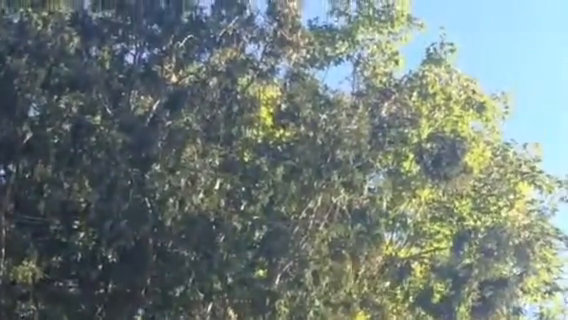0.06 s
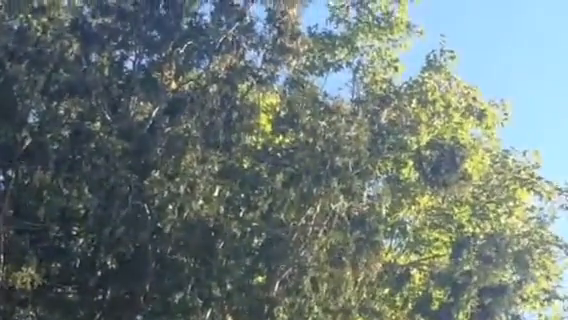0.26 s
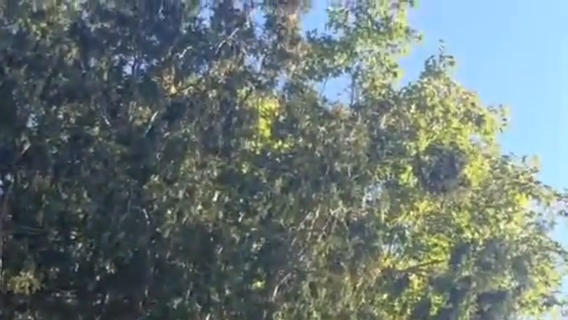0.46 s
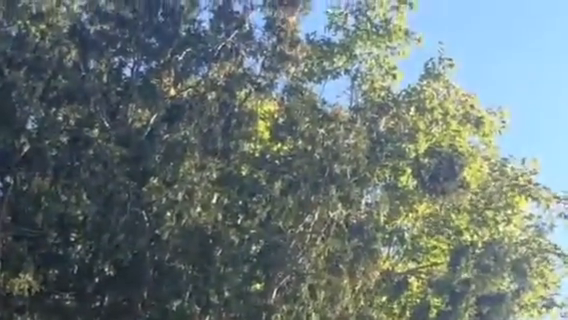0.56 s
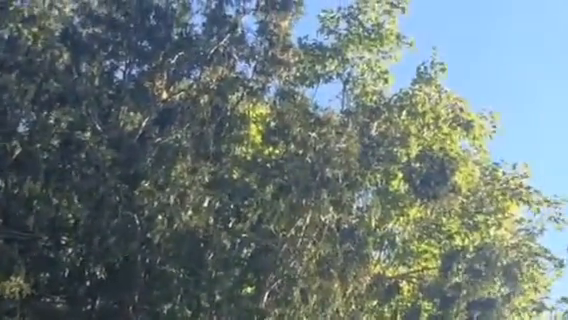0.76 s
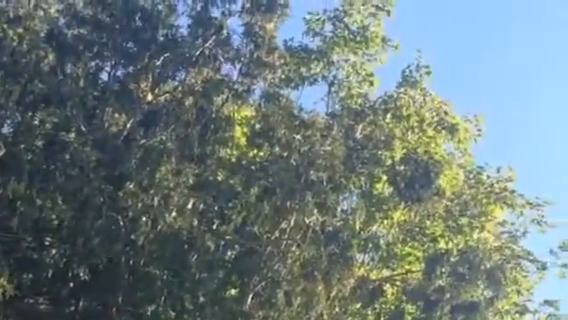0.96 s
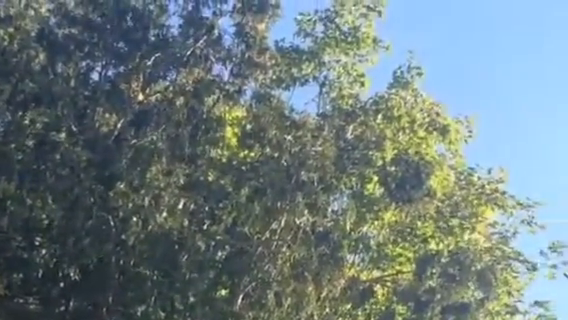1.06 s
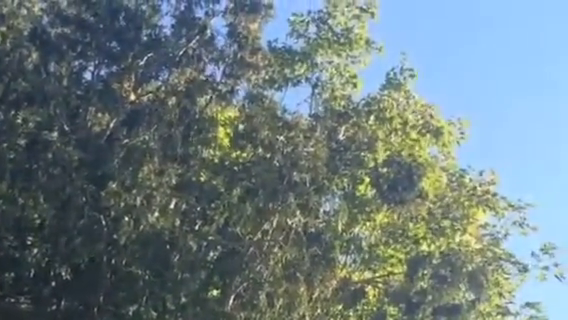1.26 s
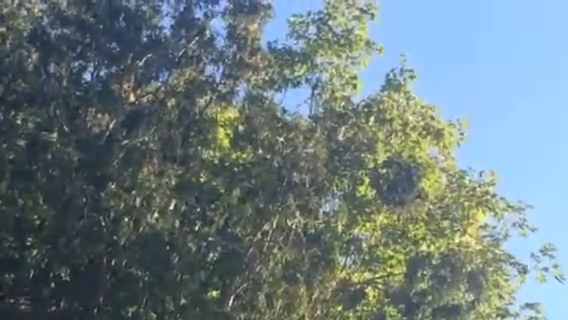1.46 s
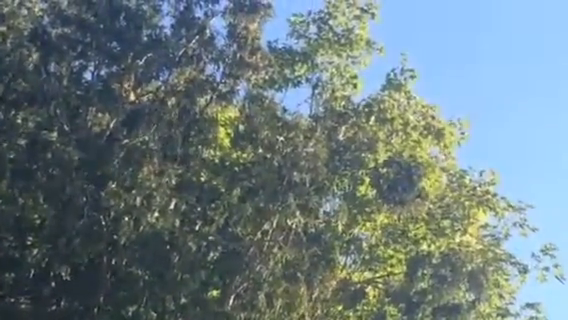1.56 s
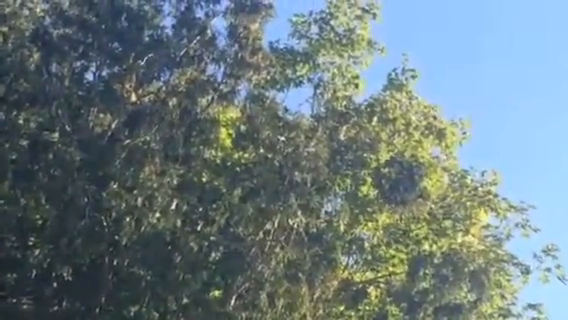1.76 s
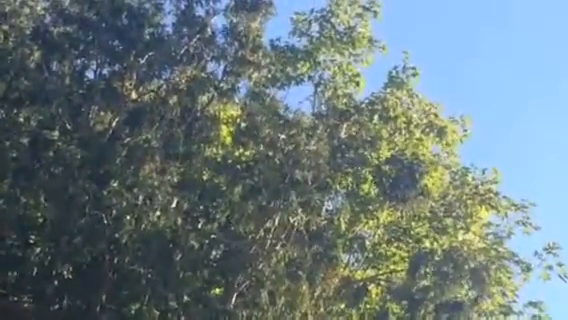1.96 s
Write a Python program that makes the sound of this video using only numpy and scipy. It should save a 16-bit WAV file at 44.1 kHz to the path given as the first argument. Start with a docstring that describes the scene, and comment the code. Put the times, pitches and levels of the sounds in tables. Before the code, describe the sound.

One sharp snap among trees, over a low outdoor rumble and faint insect chirps.

```python
"""A low outdoor rumble and hush, with insects chirping far off, heard from one microphone among trees.
At 0.22 s comes one sharp snap: a few milliseconds of bright ring and crack that jolt a low knock out of
a resonant body. The foliage scatters it back, near surfaces first and the far wood last.
Later come two faint ticks and, between them, a short soft scrape."""
import sys
import numpy as np
from scipy import signal
from scipy.fft import rfft, irfft, next_fast_len
from scipy.io import wavfile
from scipy.ndimage import map_coordinates

SR = 44100
rng = np.random.default_rng(int(sys.argv[2]) if len(sys.argv) > 2 else 0)


def bounce(signal):
    """Save signal as a 16-bit WAV file at the path given by the first command-line argument."""
    frames = np.transpose(np.atleast_2d(signal))
    limited = np.clip(frames, -1, 1)
    pcm = np.round(limited * 32767).astype(np.int16)
    wavfile.write(sys.argv[1], SR, pcm)


N = 88200

SNAP_S, ATTACK_S, HOLD_S, RELEASE_S = 0.2208, 0.00064, 0.0028, 0.0014  # the snap's onset and envelope


def amp(db):
    """Decibels to gain."""
    return 10 ** (np.asarray(db) / 20)


def unit(x):
    """x scaled to rms 1."""
    return x / np.sqrt(np.mean(x ** 2) + 1e-20)


def since(s):
    """Seconds since time s, per sample."""
    return np.arange(N) / SR - s


def curve(rows):
    """(t/s, value) rows joined by straight lines."""
    return np.interp(since(0), *np.transpose(rows))


def wobble(rate):
    """A smooth random curve with rate knots a second."""
    return map_coordinates(rng.standard_normal(4096), [np.arange(N) * rate / SR], mode="wrap")


def filtered(x, response):
    """x through a filter whose gain is response(hz)."""
    size = next_fast_len(N + SR // 2)
    return irfft(rfft(x, size) * response(np.fft.rfftfreq(size, 1 / SR)), size)[:N]


def noise(colour):
    """Noise of rms 1 with a (f/Hz, level/dB) spectrum that falls away beyond its ends."""
    f, db = np.transpose(colour)
    log_f = np.log(np.r_[f[0] / 2, f, f[-1] * 2] + 1)
    db = np.r_[db[0] - 20, db, db[-1] - 20]
    gain = lambda hz: amp(np.interp(np.log(hz + 1), log_f, db, left=-np.inf, right=-np.inf))
    return unit(filtered(rng.standard_normal(N), gain))


def resonant_noise(peaks):
    """Noise of rms 1 in steep resonances (f/Hz, half-width/Hz, level/dB)."""
    gain = lambda f: sum(amp(db) / (1 + ((f - hz) / width) ** 2) for hz, width, db in peaks)
    return unit(filtered(rng.standard_normal(N), gain))


def decay(s, t60, attack=0.0014):
    """An envelope that rises at time s and loses 60 dB every t60 seconds."""
    t = np.maximum(since(s), 0)
    return (1 - np.exp(-t / attack)) * amp(-60 * t / t60)


def echo(x, t60, attack):
    """Diffuse reflections of x off the trees: a dying noise tail of unit energy."""
    tail = rng.standard_normal(N) * decay(0, t60, attack)
    return signal.fftconvolve(x, tail / np.linalg.norm(tail))[:N]


def distant_rumble():
    """Low noise and a wavering drone swell and ebb together in the distance."""
    # lines of the drone, and spectrum of the rumble (f/Hz, level/dB)
    drone_lines = [(73, -5.5), (115.5, -3.5), (188, -6.5)]
    colour = [(22, -29), (40, -11.5), (60, -3.5), (90, -4.5), (145, -3.5), (210, -9), (260, -13),
              (340, -22), (500, -25), (650, -49)]
    # their common swell (t/s, level/dB)
    swell = [(0, -63.5), (.3, -60), (.45, -54.5), (.57, -57.5), (.68, -53.5), (.86, -52), (.93, -54.5),
             (1.07, -56), (1.15, -55), (1.32, -56.5), (1.4, -60.5), (1.58, -59), (1.68, -64.5), (2, -63.5)]
    drone, drift_rad = np.zeros(N), 0.93
    for hz, db in drone_lines:
        level = amp(db + 2.0 * wobble(7.96))
        drone += level * np.sin(2 * np.pi * hz * since(0) + drift_rad * wobble(6.96))
    return amp(curve(swell) + 1.16 * wobble(13.94)) * (amp(-2.5) * noise(colour) + amp(-2) * drone)


def woodland_air():
    """The bed of the place: a low-mid wash, a mid hush and stirring leaves."""
    # spectrum of each layer (f/Hz, level/dB)
    wash_colour = [(170, -9), (250, -1.5), (350, -2), (500, -3), (700, -15)]
    hush_colour = [(400, -29), (510, -18.5), (620, -1.5), (730, 1), (900, -5.5), (1150, -10.5), (1500, -13),
                   (2200, -25.5), (3500, -31.5), (6000, -66)]
    leaf_colour = [(600, -25), (1300, 2.5), (2300, 5.5), (3300, -10), (5000, -14.5), (9000, -42),
                   (15000, -39)]
    # slow rise and fall of each layer (t/s, level/dB)
    wash_swell = [(0, -69), (.5, -64.5), (.85, -67.5), (1.2, -74), (1.6, -71), (2, -68.5)]
    hush_swell = [(0, -57.5), (.7, -56), (1.35, -57.5), (1.55, -56.5), (1.8, -59), (2, -60.5)]
    leaf_swell = [(0, -71.5), (.45, -66.5), (.9, -64), (1.3, -71), (1.6, -72.5), (2, -74)]
    wash = amp(curve(wash_swell)) * noise(wash_colour)
    hush = amp(curve(hush_swell) + 0.45 * wobble(29.7)) * noise(hush_colour)
    leaves = amp(curve(leaf_swell) + 0.37 * wobble(8.7)) * noise(leaf_colour)
    return wash + hush + leaves


def insect_chorus():
    """Far insects merge into a faint, high hiss."""
    # spectrum of the chorus (f/Hz, level/dB)
    colour = [(2000, -9), (4000, -10), (5000, -1.5), (5700, -7), (6700, -1.5), (7900, 1), (9100, -9),
              (11000, -12), (15000, -14.5)]
    return amp(-74 + 0.4 * wobble(25.05)) * noise(colour)


def insect_chirps():
    """Each far chirp is an arch of falling pips, part tone and part lower rasp, echoing in the trees."""
    # chirps (t/s, f/Hz, level/dB, number of pips)
    chirps = [(.005, 4700, -67, 2), (.095, 5020, -77, 3), (.315, 5170, -67.5, 3), (.452, 4690, -69, 3),
              (.645, 5270, -75.5, 3), (.66, 4800, -80, 5), (.775, 5010, -80, 3), (.903, 4700, -68.5, 3),
              (1.035, 5220, -77, 5), (1.07, 4790, -78.5, 4), (1.357, 4705, -67.5, 3), (1.387, 5140, -71, 5),
              (1.847, 5300, -73, 2), (1.86, 4700, -70, 4)]
    spacing_s, width_s, spread_hz, sag_hz_per_s = 0.043, 0.009, 18, 8000
    pips = np.zeros(N)
    for s, hz, db, count in chirps:
        rasp = amp(-5) * resonant_noise([(hz - 90, 305, 0)])
        for k in range(count):
            t = since(s + k * spacing_s)
            pitch = hz + spread_hz * rng.standard_normal()
            tone = amp(-1) * np.sin(2 * np.pi * (pitch * t - sag_hz_per_s * t ** 2 / 2))
            arch_db = 2 * (2 * k / max(count - 1, 1) - 1) ** 2  # the end pips are 2 dB down
            pips += amp(db - arch_db) * np.exp(-(t / width_s) ** 2 / 2) * (tone + rasp)
    return pips + amp(-2.5) * echo(pips, t60=0.42, attack=0.013)


def snap():
    """The direct sound: a sagging ring and a crack of noise share one attack, hold and release."""
    # spectrum of the crack (f/Hz, level/dB)
    crack_colour = [(900, -10), (1750, -13), (2200, 0.5), (3200, 0), (4600, -1), (5200, -7), (5700, -5.5),
                    (7400, -7), (9500, -17), (10300, -27), (15000, -28)]
    ring_hz, sag_hz_per_s = 3959, 105000
    t = since(SNAP_S)
    envelope = np.interp(t, np.cumsum([0, ATTACK_S, HOLD_S, RELEASE_S]), [0, 1, 1, 0])
    phase = 2 * np.pi * (ring_hz * t - sag_hz_per_s * t ** 2 / 2)
    ring = np.sin(phase) + amp(-31) * np.sin(2 * phase)
    return envelope * (amp(-23) * ring + amp(-34.5) * noise(crack_colour))


def knock():
    """The snap jolts a low body: damped modes, a push and its rebound, a rough thud, a short rumble."""
    # modes of the body (f/Hz, level/dB, t60/s)
    modes = [(69.5, -52, .3), (121, -48, 0.17), (178.3, -46, 0.16), (288.7, -41.5, 0.15),
             (425, -45.5, 0.13)]
    # the push and its rebound (t/s, width/s, level/dB)
    pushes = [(.2238, 0.00093, -39.5), (.2283, 0.0013, -36.5)]
    # spectra of the thud and of the rumble after it (f/Hz, level/dB)
    thud_colour = [(45, -12), (70, -7), (180, -2), (260, 0), (400, -3.5), (520, -19)]
    rumble_colour = [(35, -9), (75, 3), (140, 2), (240, -11), (400, -30)]
    s = SNAP_S + 0.0012
    body = sum(amp(db) * decay(s, t60) * np.sin(2 * np.pi * hz * since(s)) for hz, db, t60 in modes)
    for k, (at, width, db) in enumerate(pushes):
        u = since(at) / width
        body += (-1) ** k * amp(db) * (1 - u ** 2 / 2) * np.exp(-u ** 2 / 2)
    rumble = amp(-51.5) * decay(0.275, t60=0.19, attack=0.006) * noise(rumble_colour)
    thud = amp(-46.5) * decay(s, t60=0.29) * noise(thud_colour)
    return body + thud + rumble


def foliage_scatter():
    """Surfaces near the microphone return the snap at once, the trees later, the far wood last."""
    # spectra of the near and the farther returns (f/Hz, level/dB)
    near_colour = [(900, -9.5), (2300, 1), (3700, -0.5), (4600, -5), (5500, -13.5), (7500, -12),
                   (9500, -21), (15000, -36)]
    far_colour = [(900, -4), (2300, -10.5), (3700, -5.5), (4400, -2), (5500, -10.5), (6900, -7),
                  (9500, -23), (11000, -26), (15000, -40)]
    near = amp(-42) * decay(SNAP_S + ATTACK_S + HOLD_S, t60=0.053)
    trees = amp(-53 + 2.3 * wobble(256.5)) * decay(SNAP_S + 0.0154, t60=0.22, attack=0.0019)
    far_wood = amp(-66 + 2.1 * wobble(182)) * decay(SNAP_S + 0.057, t60=0.7, attack=0.02)
    return near * noise(near_colour) + trees * noise(far_colour) + far_wood * noise(far_colour)


def ticks():
    """Two faint bursts of noise die quickly, the second shorter and brighter."""
    # ticks (t/s, level/dB, t60/s, tilt/dB per octave)
    bursts = [(0.463, -58.5, 0.14, -1), (1.739, -72, .04, 9)]
    # their spectrum before the tilt (f/Hz, level/dB)
    colour = [(800, -15), (2000, 5), (3000, 0), (5000, -10), (9000, -20), (15000, -21)]
    sound = np.zeros(N)
    for s, db, t60, tilt in bursts:
        tilted = [(hz, level + tilt * np.log2(hz)) for hz, level in colour]
        sound += amp(db) * decay(s, t60) * noise(tilted)
    return sound


def scrape():
    """One soft stroke swells and fades: a thin squeak amid narrow resonances and hiss."""
    # resonances of the scrape (f/Hz, half-width/Hz, level/dB)
    resonances = [(1980, 99, -6.5), (2270, 100, 0), (2620, 110, -12), (2970, 130, -9), (3400, 100, -19)]
    # spectrum of its hiss (f/Hz, level/dB)
    hiss_colour = [(3000, -14), (6000, -6), (7800, -1), (10000, -10), (15000, -19)]
    peak_s, width_s, squeak_hz = 1.4212, 0.0052, 2803
    t = since(peak_s)
    u = t / width_s
    stroke = np.exp(-u ** 2 / 2) + amp(-13) * np.exp(-(u / 2.6) ** 2 / 2)  # a peak on a wider skirt
    squeak = amp(-52) * np.sin(2 * np.pi * squeak_hz * t)
    return stroke * (squeak + amp(-52.5) * resonant_noise(resonances) + amp(-69) * noise(hiss_colour))


def scene():
    """Everything meets at one microphone; the ring of the snap lingers in the trees."""
    direct = snap()
    lingering = amp(-24) * echo(direct, t60=0.29, attack=0.0014)
    events = direct + lingering + knock() + foliage_scatter() + ticks() + scrape()
    ambience = insect_chirps() + distant_rumble() + woodland_air() + insect_chorus()
    return (events + ambience)[None]


def record(dry):
    """The recorder keeps nothing above its band limit."""
    top_hz = 15280
    return np.array([filtered(x, lambda hz: hz < top_hz) for x in dry])


dry = scene()
out = record(dry)
bounce(out)
```